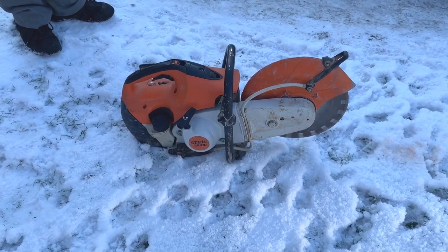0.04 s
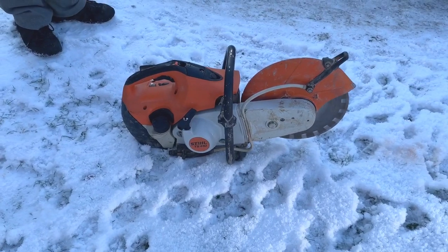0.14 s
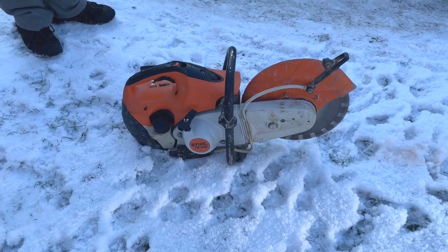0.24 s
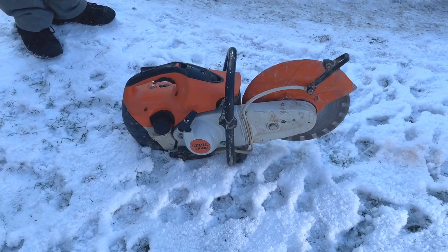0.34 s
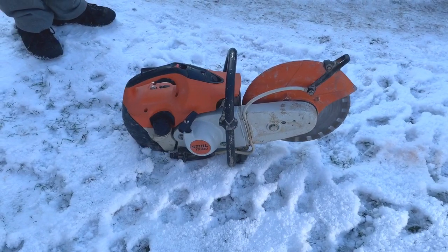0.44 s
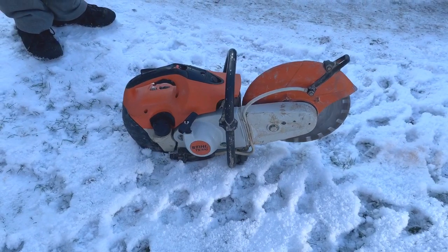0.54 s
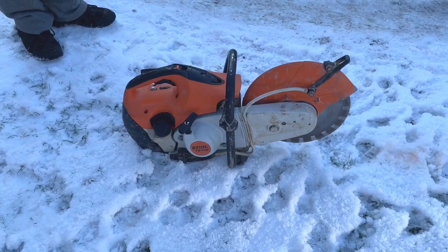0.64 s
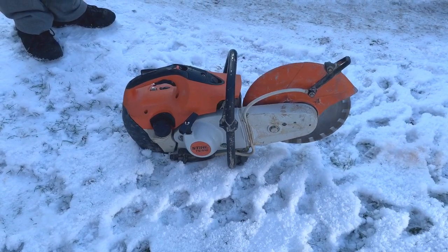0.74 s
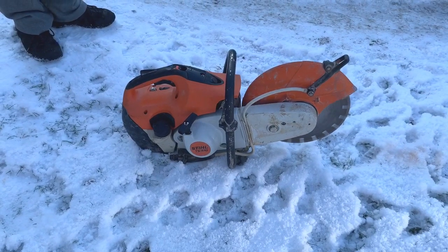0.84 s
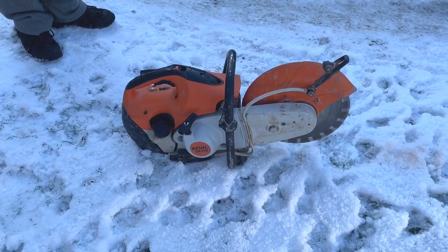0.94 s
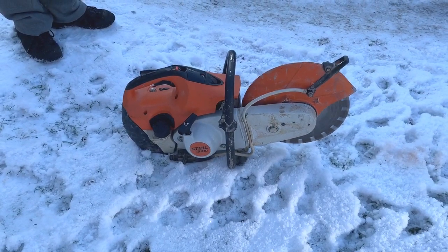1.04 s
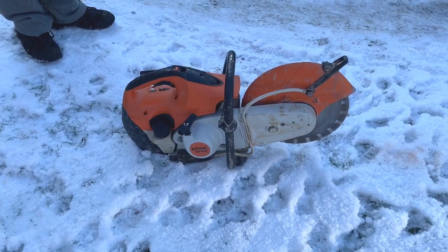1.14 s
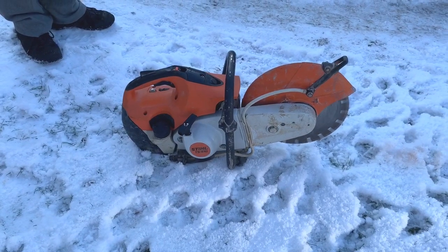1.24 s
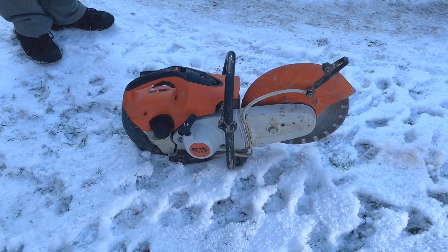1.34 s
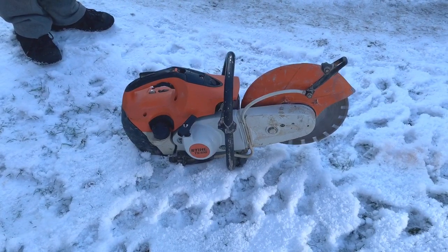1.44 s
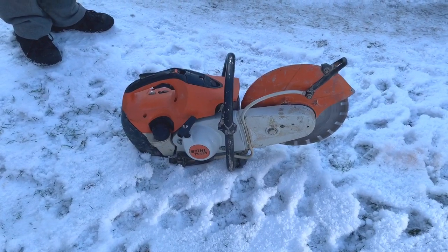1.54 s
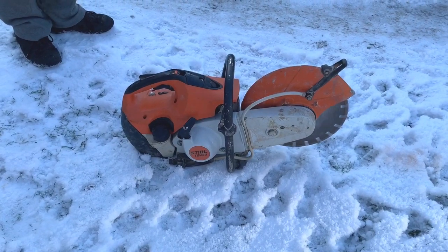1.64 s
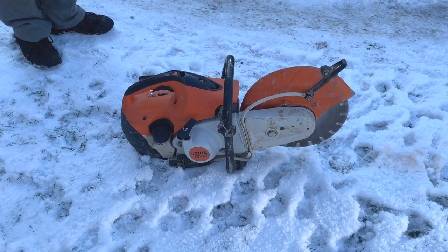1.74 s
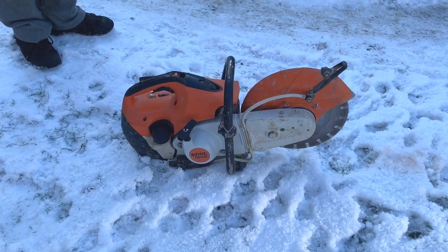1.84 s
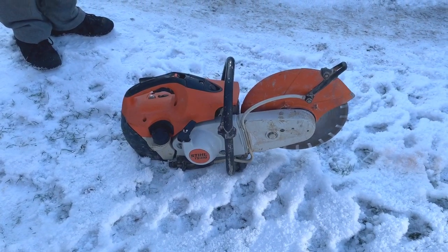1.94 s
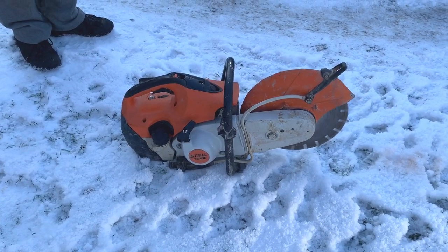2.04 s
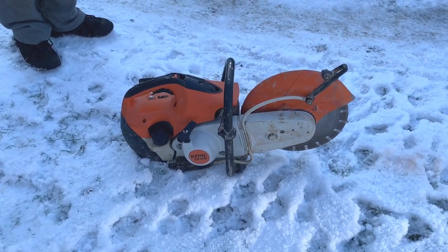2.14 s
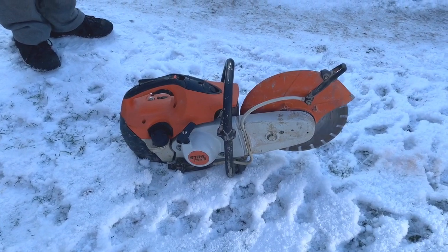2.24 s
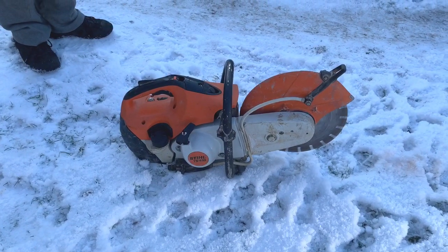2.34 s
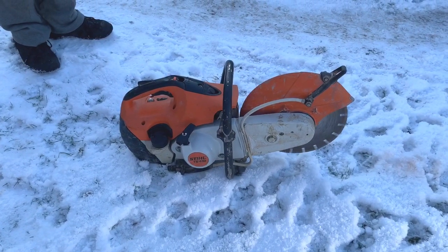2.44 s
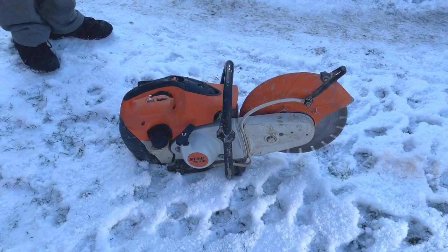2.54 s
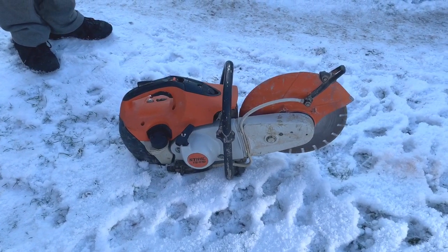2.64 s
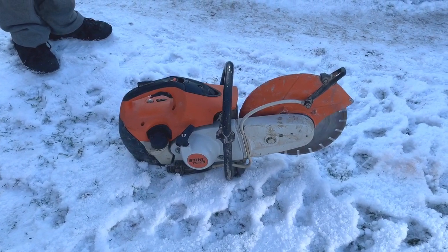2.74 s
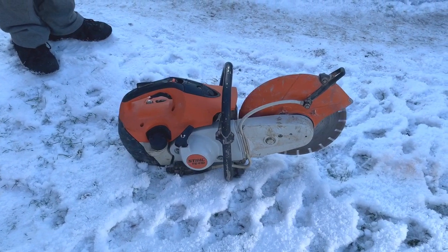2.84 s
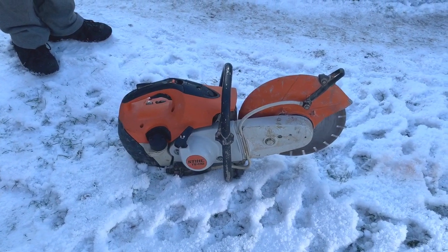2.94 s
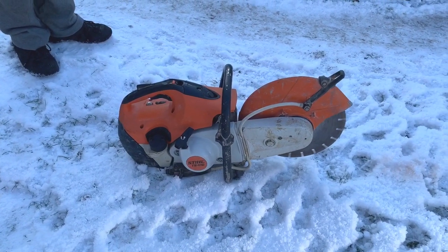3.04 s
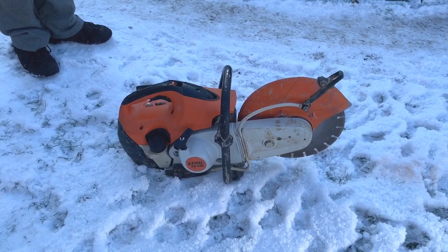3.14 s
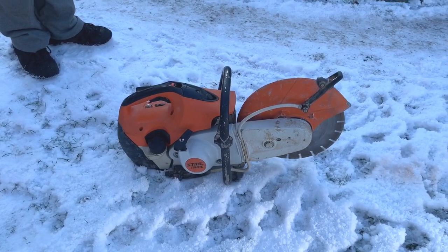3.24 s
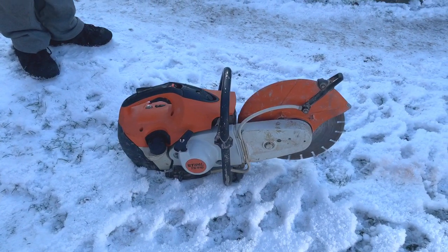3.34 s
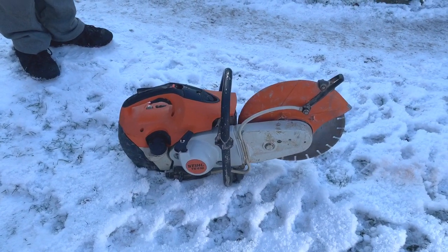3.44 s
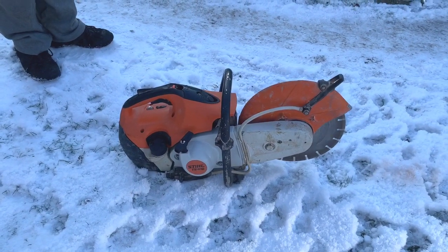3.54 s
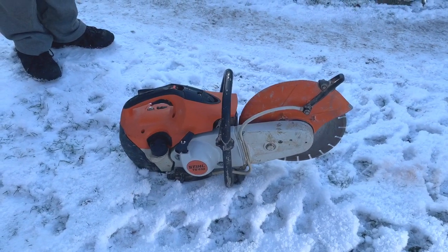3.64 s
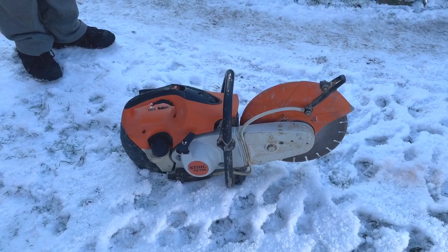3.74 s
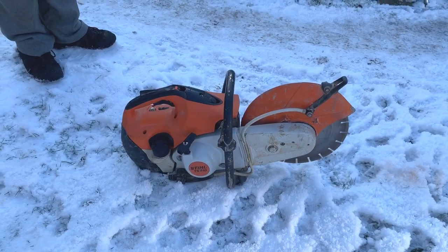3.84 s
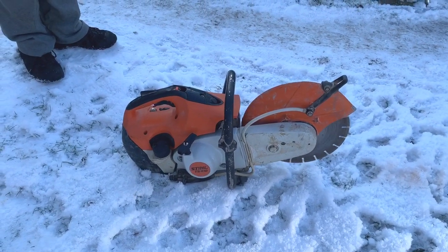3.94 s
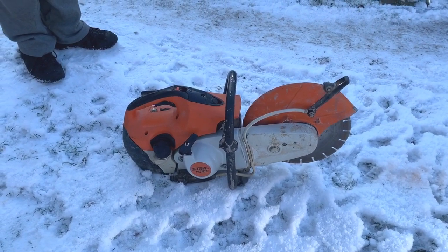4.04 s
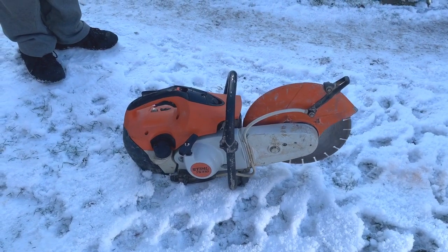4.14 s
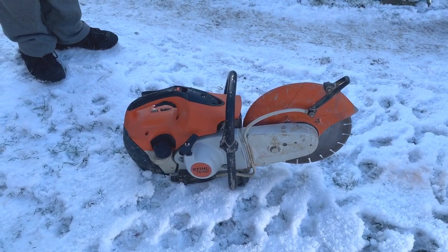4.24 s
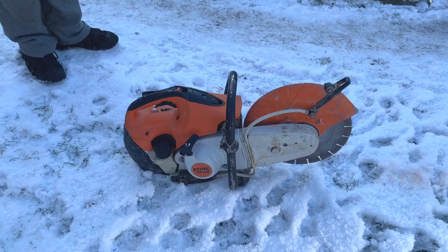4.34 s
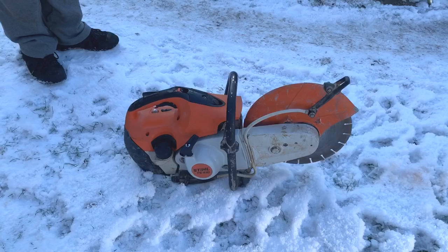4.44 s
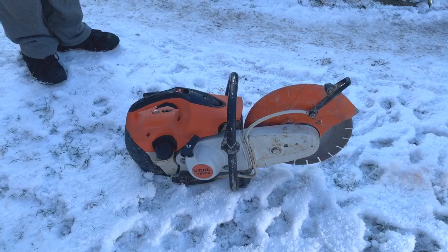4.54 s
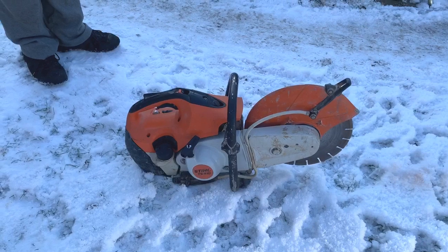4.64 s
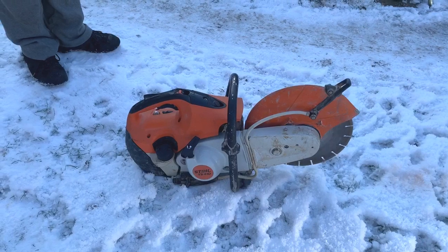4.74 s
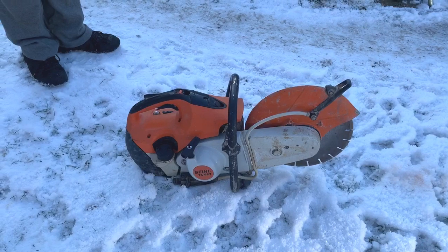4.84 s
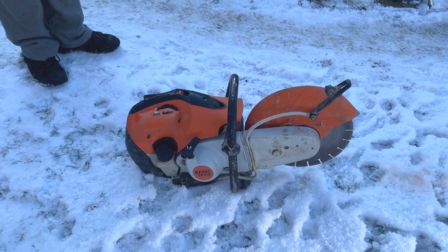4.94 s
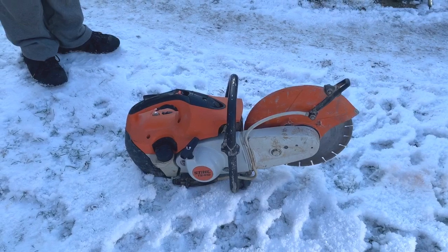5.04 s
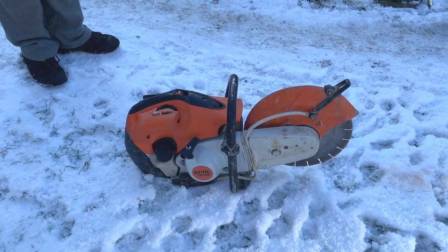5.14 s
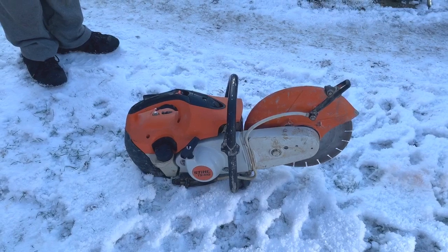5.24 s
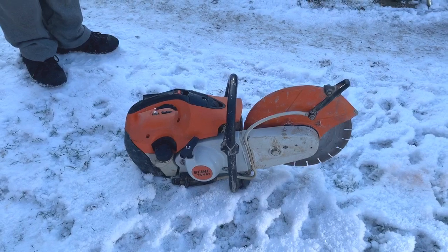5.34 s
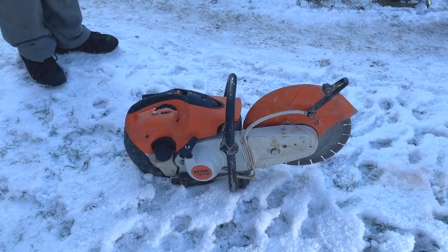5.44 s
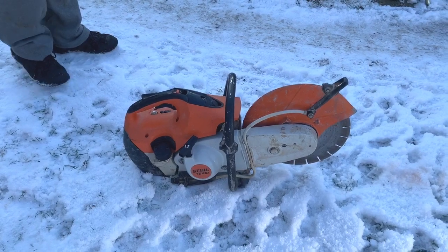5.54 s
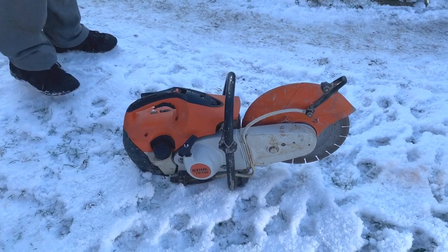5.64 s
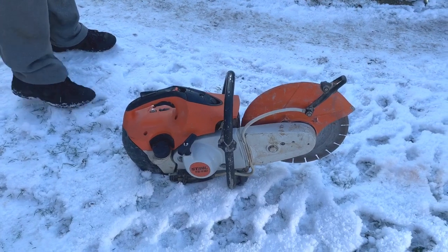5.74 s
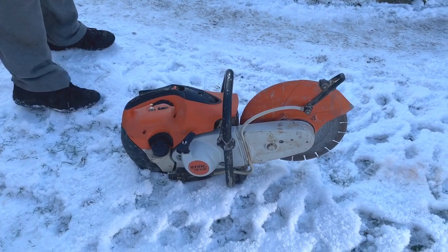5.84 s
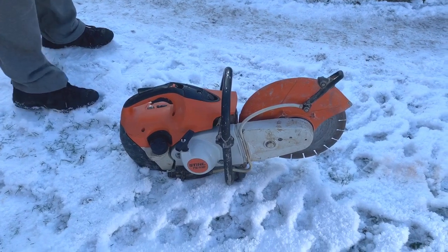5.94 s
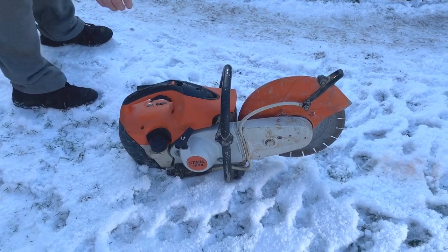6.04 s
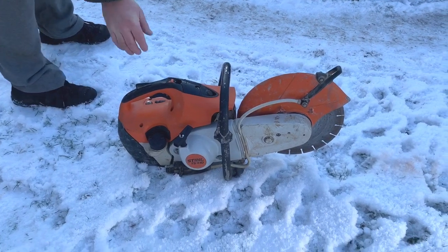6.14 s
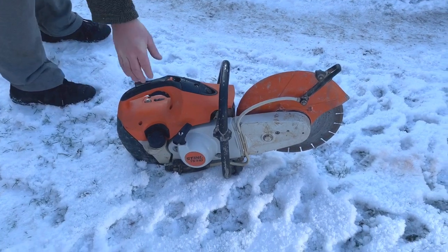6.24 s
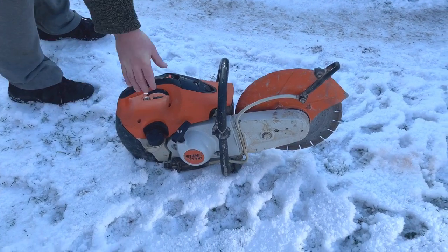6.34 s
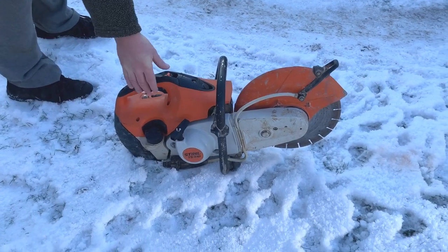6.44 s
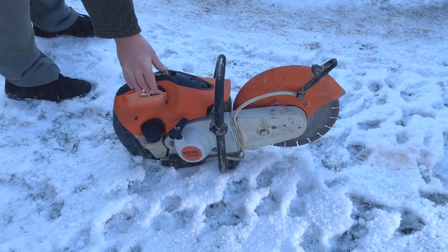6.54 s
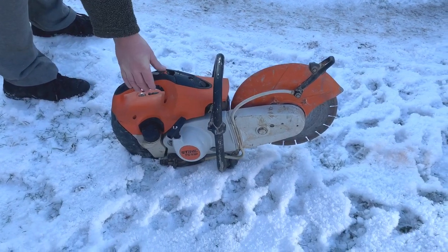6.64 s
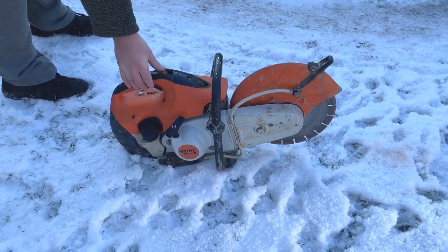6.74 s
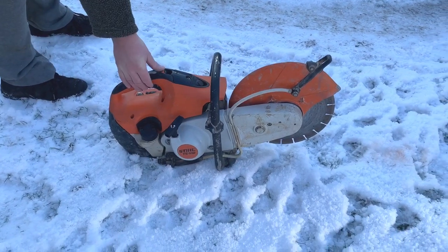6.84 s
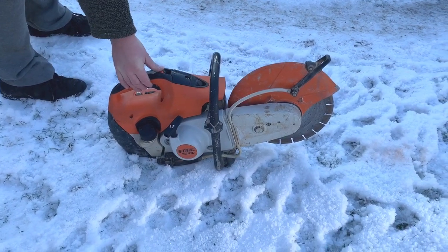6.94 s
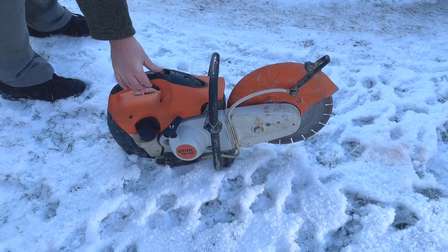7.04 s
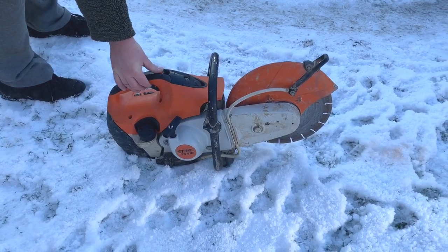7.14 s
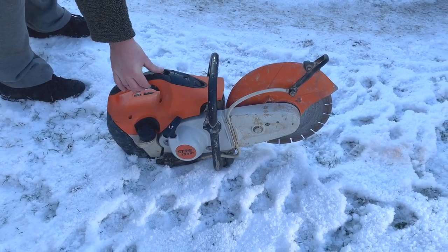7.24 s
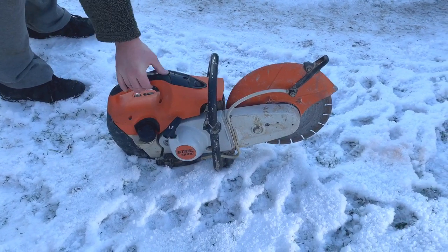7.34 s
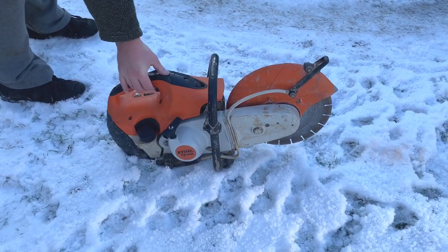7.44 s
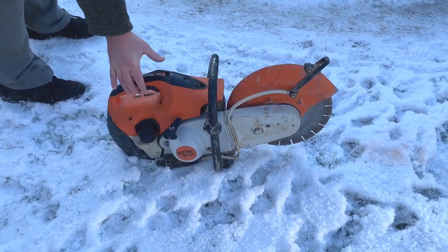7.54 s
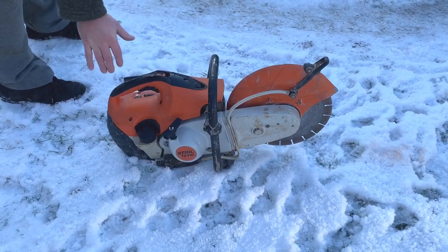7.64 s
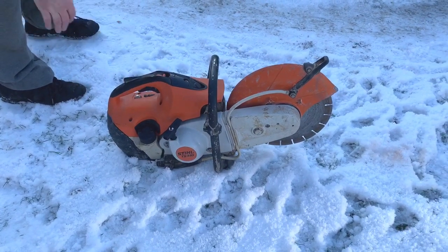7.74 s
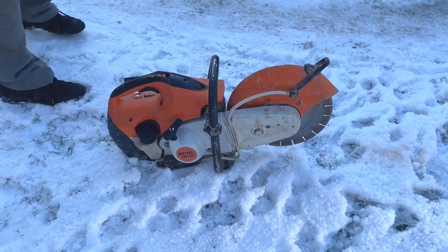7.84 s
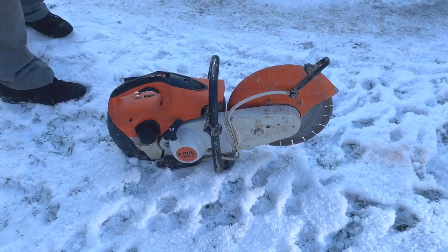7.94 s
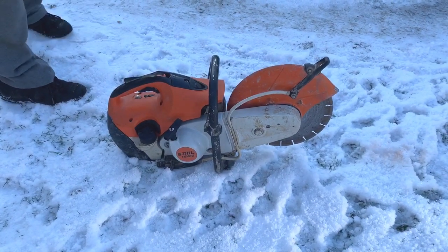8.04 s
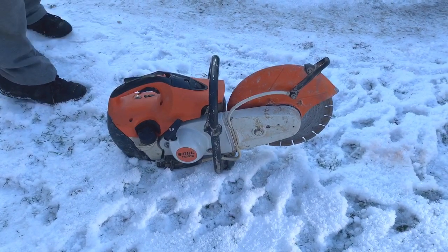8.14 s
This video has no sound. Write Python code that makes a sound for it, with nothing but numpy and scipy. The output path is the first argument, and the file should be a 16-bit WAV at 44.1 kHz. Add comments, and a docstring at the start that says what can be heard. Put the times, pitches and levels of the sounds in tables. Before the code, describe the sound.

A two-stroke petrol cut-off saw idles very close on open snowy ground. Sharp cracks with deep thumps come unevenly, about six a second, each setting off a rattle of clutch, belt and guard over rapid low puffing. It starts slightly weaker and grows fuller. At about 7.2 seconds the firing stops; slowing puffs, clacks and a low sagging groan end near 8 seconds. Dry, close stereo pickup with no echo.

```python
"""On open, snowy ground a two-stroke petrol cut-off saw idles close by, is switched off and coasts to rest.
It fires only once every four to twelve turns: each firing cracks and thumps, kicks the crank faster and
shakes clutch, belt and guard into a clatter. Between firings the piston pumps air and knocks as it slows.
Metal sounds are sprays of noise shaped by the casing; low sounds are short tones, pulses and soft noise."""
import sys
import numpy as np
from scipy import signal
from scipy.fft import rfft, irfft, next_fast_len
from scipy.io import wavfile
from scipy.ndimage import uniform_filter1d

SR = 44100
rng = np.random.default_rng(int(sys.argv[2]) if len(sys.argv) > 2 else 0)


def write(x):
    x = np.atleast_2d(x).T
    wavfile.write(sys.argv[1], SR, np.round(np.clip(x, -1, 1) * 32767).astype(np.int16))


N = 361615
TIME = np.arange(N) / SR

# Firings; the kick speeds up the crank and shakes the drive. Each sound adds its own gain to these levels:
# (time [s], crack [dB], kick [dB])
FIRINGS = [(-0.04, -17, -18.5), (0.114, -16.5, -18.5), (0.35, -22, -37), (0.514, -17.5, -22.5),
           (0.66, -15, -15.5), (0.842, -15, -17), (1.001, -14.5, -13), (1.252, -15.5, -20.5),
           (1.391, -15.5, -20.5), (1.601, -17.5, -20), (1.744, -14.5, -17.5), (1.907, -13, -17),
           (2.068, -13.5, -16), (2.221, -18.5, -28.5), (2.509, -17, -21), (2.65, -12, -16.5),
           (2.811, -12.5, -16.5), (2.97, -13, -18.5), (3.108, -12, -17), (3.34, -16, -21.5),
           (3.494, -19, -28.5), (3.619, -14, -17.5), (3.783, -11.5, -10), (3.971, -13, -15),
           (4.129, -14, -19.5), (4.275, -11.5, -13), (4.455, -12.5, -13), (4.612, -12, -13.5),
           (4.772, -14.5, -20.5), (4.884, -18, -23), (5.006, -12, -14), (5.168, -12.5, -17.5),
           (5.278, -14.5, -17), (5.516, -12, -16.5), (5.655, -10, -15), (5.814, -13, -14), (5.98, -10, -13),
           (6.332, -15, -17), (6.477, -13, -12.5), (6.711, -15, -22), (6.824, -13.5, -15.5),
           (6.984, -10.5, -12.5), (7.156, -11.5, -13.5)]
# Unfired turns with the ignition off: (time [s])
COASTING_TURNS = [7.346, 7.382, 7.426, 7.492, 7.552, 7.617, 7.694, 7.785]
# Loose metal parts clinking, before the gain of each part of the sound: (time [s], level [dB], treble [dB])
CLINKS = [(0.2972, -13, -19.5), (0.422, -30, -22), (0.4494, -39, -21), (1.1667, -9.5, -16),
          (2.0223, -27, -20), (3.259, -9.5, -15.5), (3.4714, -21, -21), (4.3714, -8, -25),
          (5.4184, -11, -16.5), (6.125, -15, -22), (6.1475, -9.5, -20.5), (7.3593, -14, -24.5),
          (7.435, -23, -24), (7.647, -19.5, -25), (7.6847, -30, -34), (7.7353, -25.5, -33.5),
          (7.8131, -28.5, -61), (7.9154, -30.5, -52)]

# Tone colour of the muffler's puff, relative levels: (frequency [Hz], level [dB])
PUFF_SPECTRUM = [(20, -42.5), (45, -17.5), (70, 2), (100, 6.5), (140, -2.5), (200, -5.5), (300, -18.5),
                 (500, -14.5), (1200, -69)]
# Tone colour of the deep thump of a firing: (frequency [Hz], level [dB])
THUMP_SPECTRUM = [(18, -44.5), (36, -21), (60, 1.5), (110, -5.5), (170, -1), (300, -13.5), (500, -9.5),
                  (1200, -46.5)]
# Tone colour of the longer, duller blast of a firing: (frequency [Hz], level [dB])
BLAST_SPECTRUM = [(40, -25), (150, -4.5), (420, -8.5), (850, 3), (1250, -2.5), (1650, 4), (2600, -5),
                  (3600, -1.5), (4800, -11.5), (6300, -7), (14000, -11.5)]
# Tone colour of the very short, bright snap of a firing: (frequency [Hz], level [dB])
SNAP_SPECTRUM = [(2000, -18), (3700, 8), (4800, -5.5), (6500, 2), (8000, 5.5), (15000, -5)]
# Tone colour of chattering clutch, belt and guard: (frequency [Hz], level [dB])
CLATTER_SPECTRUM = [(40, -37), (420, -7), (850, -8), (1250, -10.5), (1650, -2), (2100, -2.5), (3000, -8),
                    (3900, -5.5), (4600, -21.5), (6200, -9), (7000, -22.5), (11300, -14), (12800, -19.5),
                    (14600, -20.5)]
# Tone colour of fan, belt and bearings: (frequency [Hz], level [dB])
RUSTLE_SPECTRUM = [(30, -28.5), (150, -1), (420, -4), (850, -4), (1250, -9), (1700, -4.5), (2200, -11),
                   (3000, -14.5), (3900, -16), (4600, -21), (6300, -18.5), (8000, -18.5), (11000, -19),
                   (14500, -35)]
# Tone colour of the piston slap: (frequency [Hz], level [dB])
KNOCK_SPECTRUM = [(300, -22.5), (1400, -29), (2200, -6.5), (2620, -3), (3050, -16.5), (3520, -8),
                  (4300, -29), (14000, -36)]
# Tone colour of the distant open-air hum: (frequency [Hz], level [dB])
OUTDOORS_SPECTRUM = [(30, 1), (100, -4.5), (250, -3.5), (600, 4), (900, -3.5), (1500, -21), (4000, -22),
                     (14000, -29.5)]
# Tone colour of gas flow buffeting the casing: (frequency [Hz], level [dB])
RUMBLE_SPECTRUM = [(25, -35.5), (60, -19.5), (110, 4), (230, 3.5), (330, 0.5), (600, -38.5)]
# Low resonance of the casing in the rumble: (frequency [Hz], width [Hz], boost [dB])
RUMBLE_RESONANCE = [(94.0, 66, 8)]
# Tone colour of the hollow clack of a clink: (frequency [Hz], level [dB])
CLACK_SPECTRUM = [(200, -2.5), (800, -4.5), (1250, -8.5), (1650, 0.0), (2200, 0.0),
                  (2800, -8), (3500, -3.5), (5000, -20.5), (14000, -41.5)]
# Tone colour of the bright tick of a clink: (frequency [Hz], level [dB])
TICK_SPECTRUM = [(1500, 4), (3500, -19.5), (5000, 0.0), (8000, 6.5), (11000, 1.5), (15000, -7)]

# Resonances of casing, fins and guard, shared by all metal noise; a negative boost is a dip:
# (frequency [Hz], width [Hz], boost [dB])
CASING_RESONANCES = [(452, 56, 2), (595, 55, 5.5), (703, 39, -4.5), (822, 65, 4.5), (1012.3, 40, -14.5),
                     (1034, 46, 12.5), (1210, 53, -9.5), (1234, 20, 13.5), (1566, 44, 5), (2025, 55, 7),
                     (2175, 56, 7.5), (2336, 45, -8), (2372, 24, 10.5), (2607, 58, 9.5), (3513, 68, 5.5),
                     (5890, 81, 6), (7940, 140, 5.5)]
# Guard and blade ringing on after a clink: (frequency [Hz], level [dB], time to fall 60 dB [s])
RING_MODES = [(824, -22, .4), (1863, -17, .16), (2713, -33, .9), (3806, -26, .5)]
# The whole saw rocking on its rubber mounts: (frequency [Hz], level [dB], time to fall 60 dB [s])
MOUNT_MODES = [(47, -14, 0.023), (94.4, -16.5, 0.16), (143.7, 7, 0.051)]

# How alike the two microphone channels are: (frequency [Hz], likeness [0 to 1])
CHANNEL_LIKENESS = [(100, 1), (500, .94), (1500, .95), (2000, .88), (2500, .65), (4000, .65), (5200, .45),
                    (6200, .55), (7000, .85), (8300, .995), (9000, .995), (11500, .9), (13200, .99),
                    (14500, .93)]
# Level of the left channel minus the right: (frequency [Hz], difference [dB])
CHANNEL_BALANCE = [(60, -15), (300, -1), (1000, -1), (1700, -1.5), (2700, -.6), (3500, -1.5), (5400, -9),
                   (6600, 0.5), (15000, 0)]
# Phase by which the right channel leads: (frequency [Hz], lead [radians])
CHANNEL_LEAD = [(1900, 0), (3200, -1.4), (4200, -.8), (5300, -2), (6400, -.2), (7200, .5), (8100, 2.95),
                (9000, 3.3), (10300, 5.9), (11700, 6.6), (12700, 9.2), (13800, 9.6), (14900, 12.2)]

EDGE_HZ = 15500  # upper edge of the sound
# Crank speed sought after a firing: a base, plus this much for a kick of 0 dB.
# Each later turn is longer by the share SLOWING; whole turns are then fitted between the firings.
BASE_TURNS_PER_S, KICK_TURNS_PER_S, SLOWING = 33, 45, .033
# The thump: its level at a usual crack, and the dB it gains for each dB of crack
THUMP_DB, USUAL_CRACK_DB, THUMP_PER_CRACK = -7, -13.5, 0.29
# Weaker sounds at the start, while the engine is cold; WARM_UP_S is the time constant of the recovery
WARM_UP_S, COLD_FLOW_DB, COLD_THUMP_DB, COLD_RUNNING_DB = 2.07, -1.5, -4.5, -5
# Changes reached by the last coasting turn: weaker gas flow, and a honk lower by a share of its pitch
SPENT_INTAKE_DB, SPENT_EXHAUST_DB, SPENT_SAG = -19, -7.5, 0.42
REST_S = 8.0  # the crank has stopped
# Steady running noise, before each sound's own gain: level at idling speed, and its rise with speed
RUNNING_DB, IDLE_TURNS_PER_S, RUNNING_DB_PER_OCTAVE = -23.5, 34.6, 4
# With the ignition off the drive runs slack: running noise drops by this much over this time
SLACK_DB, SLACK_S = -11, 0.18
# Groan of the stopping drive: time of its peak, level and pitch there, and how fast it sinks
GROAN_S, GROAN_DB, GROAN_HZ, GROAN_OCTAVES_PER_S = 7.89, -41, 111, 2.1
GROAN_RISE_S, GROAN_FALL_S = .05, .085


def from_db(db):
    """Turns decibels into gain."""
    return 10 ** (np.asarray(db) / 20)


def unit(x):
    """Scales a signal to an average strength (rms) of 1."""
    return x / np.sqrt(np.mean(x ** 2) + 1e-20)


def lookup(points, hz):
    """Reads a table by frequency, spaced by pitch (a log axis)."""
    f, value = np.transpose(points)
    return np.interp(np.log(hz + 1), np.log(f), value)


def strikes(times, gains):
    """Makes a train of single clicks."""
    train = np.zeros(N)
    at = np.round(np.asarray(times) * SR).astype(int)
    inside = (at >= 0) & (at < N)
    np.add.at(train, at[inside], np.asarray(gains)[inside])
    return train


def response(spectrum, resonances=(), size=4096):
    """Filter with a given tone colour and resonances that answers at once (minimum phase), peak 1."""
    hz = np.fft.rfftfreq(size, 1 / SR)
    peaks = sum(boost / (1 + (2 * (hz - f) / width) ** 2) for f, width, boost in resonances)
    db = lookup(spectrum, hz) + peaks
    # folding the cepstrum moves all the response after time zero
    cepstrum = irfft(np.log(from_db(db)))
    cepstrum[1:size // 2] *= 2
    cepstrum[size // 2 + 1:] = 0
    taps = irfft(np.exp(rfft(cepstrum)))
    return taps / abs(taps).max()


def bursts(times, db, rise, fall):
    """Power of bursts that swell up to the given times and then die away (rise and fall in s)."""
    t = np.arange(-SR // 10, SR // 10 + 1) / SR
    shape = np.exp(-2 * np.maximum(-t / rise, t / fall))
    return abs(signal.oaconvolve(strikes(times, from_db(db) ** 2), shape, "same"))


def metal(power, spectrum, spread_db, per_second=1400, fall=0.0035):
    """A dense spray of tiny impacts, each dying quickly in the casing; two channels."""
    strength = from_db(spread_db * np.minimum(rng.standard_normal(N), 2)) ** 2
    impacts = (rng.random(N) < per_second / SR) * strength
    grains = signal.lfilter([1], [1, -np.exp(-2 / (fall * SR))], impacts)
    taps = response(spectrum, CASING_RESONANCES)
    drive = np.sqrt(power * grains / grains.mean()) * rng.standard_normal((2, N))
    return signal.oaconvolve(drive, taps[None] / np.linalg.norm(taps), axes=1)[:, :N]


def ringing(modes):
    """One second of freely dying tones."""
    t = np.arange(SR) / SR
    return sum(from_db(db - 60 * t / t60) * np.sin(2 * np.pi * hz * t) for hz, db, t60 in modes)


def crank():
    """Times of all running turns: a harder kick spins the crank faster, then each turn takes longer."""
    fired, _, kick_db = np.transpose(FIRINGS)
    speeds = BASE_TURNS_PER_S + KICK_TURNS_PER_S * from_db(kick_db)
    ends = np.append(fired[1:], COASTING_TURNS[0])
    turns = []
    for start, end, speed in zip(fired, ends, speeds):
        count = round(np.log1p((end - start) * speed * SLOWING) / np.log1p(SLOWING))
        periods = (1 + SLOWING) ** np.arange(count)
        turns.append(start + (end - start) * (np.cumsum(periods) - periods) / periods.sum())
    return np.concatenate(turns)


def cold(times):
    """1 for the freshly started engine, falling towards 0 as it warms."""
    return np.exp(-np.maximum(times, 0) / WARM_UP_S)


def throb(turns, depth_db, lag):
    """Power factor that swells once in every turn of the crank, unevenly; lag is in turns."""
    angle = np.interp(TIME, turns, np.arange(len(turns)))
    uneven_db = np.interp(TIME, turns, rng.standard_normal(len(turns)))
    return from_db(depth_db * np.cos(2 * np.pi * (angle - lag)) + uneven_db) ** 2


def running_db(turns, inertia_s=0.1):
    """Level of the steady running noise: it follows the smoothed speed of the crank down to rest."""
    times = np.append(turns, COASTING_TURNS)
    midpoints = (times[1:] + times[:-1]) / 2
    speed = np.interp(TIME, np.append(midpoints, REST_S), np.append(1 / np.diff(times), 0))
    speed = np.maximum(uniform_filter1d(speed, round(inertia_s * SR)), .01)
    speed_db = RUNNING_DB_PER_OCTAVE * np.log2(speed / IDLE_TURNS_PER_S)
    slack_db = SLACK_DB * np.clip((TIME - COASTING_TURNS[0]) / SLACK_S, 0, 1)
    return RUNNING_DB + speed_db + COLD_RUNNING_DB * cold(TIME) + slack_db


def outdoors(level_db=-56, waver_db=4.0, waver_s=.04):
    """Faint, distant open-air hum: filtered noise whose level wavers a little."""
    taps = response(OUTDOORS_SPECTRUM)
    waver = unit(uniform_filter1d(rng.standard_normal(N), round(waver_s * SR)))
    hum = unit(signal.oaconvolve(rng.standard_normal((2, N)), taps[None], axes=1)[:, :N])
    return from_db(level_db + waver_db * waver) * hum


def rustle(turns, gain_db=-2):
    """Fan, belt and bearings make a noise that pulses with the crank."""
    power = from_db(running_db(turns) + gain_db) ** 2
    return metal(power * throb(turns, depth_db=3.5, lag=0.58), RUSTLE_SPECTRUM, spread_db=3.5)


def rumble(turns, gain_db=-4):
    """Uneven gas flow buffets the casing and stirs its low resonance."""
    taps = response(RUMBLE_SPECTRUM, RUMBLE_RESONANCE, size=16384)
    noise = unit(signal.oaconvolve(rng.standard_normal(N), taps)[:N])
    return noise * from_db(running_db(turns) + gain_db)


def gas_flow(turns, intake_hz=240, intake_length=0.0039, intake_db=-13, exhaust_lag=0.00559,
             exhaust_db=-19.0, rocking_db=-11, recoil_db=-5, coast_db=3.0, fade_power=2.6,
             uneven_db=1.5, uneven_pitch=0.044, uneven_s=0.00038):
    """Each turn the air box honks and the muffler puffs; a firing adds a deep thump. Both rock the saw."""
    times = np.append(turns, COASTING_TURNS)
    chance = rng.standard_normal((len(times), 4))
    coast_share = (times - COASTING_TURNS[0]) / (COASTING_TURNS[-1] - COASTING_TURNS[0])
    spent = np.clip(coast_share, 0, 1) ** fade_power
    flow_db = coast_db * (times >= COASTING_TURNS[0]) + COLD_FLOW_DB * cold(times)

    gulp = from_db(intake_db + flow_db + SPENT_INTAKE_DB * spent + uneven_db * chance[:, 0])
    pitch = intake_hz * (1 - SPENT_SAG * spent + uneven_pitch * chance[:, 1])
    nearest = np.searchsorted((times[1:] + times[:-1]) / 2, TIME)
    t = TIME - times[nearest]
    port_opening = np.exp(-(t / intake_length) ** 2)  # the port opens and shuts smoothly
    honks = gulp[nearest] * port_opening * np.cos(2 * np.pi * pitch[nearest] * t)

    puff_db = exhaust_db + flow_db + SPENT_EXHAUST_DB * spent + uneven_db * chance[:, 3]
    puffs = strikes(times + exhaust_lag + uneven_s * chance[:, 2], from_db(puff_db))

    fired, crack_db, _ = np.transpose(FIRINGS)
    thump_db = THUMP_DB + THUMP_PER_CRACK * (crack_db - USUAL_CRACK_DB) + COLD_THUMP_DB * cold(fired)
    thumps = strikes(fired + 0.0011, from_db(thump_db))
    exhaust = signal.oaconvolve(puffs, response(PUFF_SPECTRUM))
    exhaust = exhaust - signal.oaconvolve(thumps, response(THUMP_SPECTRUM))

    pushes = puffs - from_db(recoil_db) * thumps
    rocking = signal.oaconvolve(pushes, from_db(rocking_db) * ringing(MOUNT_MODES))
    # slow motion hardly radiates sound
    sway = signal.sosfilt(signal.butter(4, 38, "high", fs=SR, output="sos"), rocking[:N])
    return honks + exhaust[:N] + sway


def cracks(lead=0.0044, blast_db=2.0, snap_lead=0.0043, snap_db=4):
    """Each firing gives a very short bright snap inside a longer, duller blast, just ahead of its thump."""
    fired, crack_db, _ = np.transpose(FIRINGS)
    blast_power = bursts(fired - lead, crack_db + blast_db, rise=0.0024, fall=0.017)
    blast = metal(blast_power, BLAST_SPECTRUM, spread_db=0.0, per_second=4300)
    snap_power = bursts(fired - snap_lead, crack_db + snap_db, rise=0.0007, fall=0.008)
    snap = metal(snap_power, SNAP_SPECTRUM, spread_db=4.5, per_second=2900)
    return blast + snap


def clatter(turns, onset=0.015, decay=0.067, gain_db=5.0):
    """Each kick sets clutch, belt and guard chattering until the shaking dies down."""
    fired, _, kick_db = np.transpose(FIRINGS)
    recent = np.searchsorted(fired, TIME) - np.array([[1], [2]])  # the last two firings overlap
    t = np.maximum(TIME - fired[recent], 0)
    build_up = 1 - np.exp(-(t / onset) ** 2)
    shaking = from_db(kick_db + gain_db)[recent] * build_up * np.exp(-(t / decay) ** 0.86)
    power = (shaking ** 2).sum(axis=0) * throb(turns, depth_db=1.9, lag=0.72)
    return metal(power, CLATTER_SPECTRUM, spread_db=0.5)


def knocks(turns, lead=0.015, slow_period=0.034, slow_db=-16.0, db_per_octave=34, firing_db=-1.5):
    """The piston slaps near the top of its stroke: harder as the crank slows, and again at a firing."""
    periods = np.diff(turns)
    slowness = np.minimum(np.log2(periods / slow_period), 0)  # in octaves
    level_db = slow_db + db_per_octave * slowness + 2 * rng.standard_normal(len(periods))
    fired, crack_db, _ = np.transpose(FIRINGS)
    power = bursts(turns[1:] - lead, level_db, rise=.003, fall=.011)
    power += bursts(fired - .013, crack_db + firing_db, rise=0.0015, fall=0.014)
    return metal(power, KNOCK_SPECTRUM, spread_db=2.5, per_second=3000)


def backlash(lead=0.0091, clack_db=-22, treble_db=-46):
    """As the engine coasts, play in the drive clacks at every compression: rows like those of CLINKS."""
    return [(s - lead, clack_db, treble_db) for s in COASTING_TURNS]


def clinks(body_db=-7, ring_db=-18, ring_per_db=0.9):
    """Loose parts strike: a hollow clack, a bright tick, and a faint ring of guard and blade."""
    times, db, treble_db = np.transpose(list(CLINKS) + backlash())
    ring_strikes = strikes(times, from_db(ring_db + ring_per_db * db))
    ring = signal.oaconvolve(ring_strikes, ringing(RING_MODES))[:N]
    clack_power = bursts(times + .003, db + body_db, rise=0.0033, fall=0.014)
    clack = metal(clack_power, CLACK_SPECTRUM, spread_db=5.0)
    tick_power = bursts(times + 0.00092, treble_db, rise=.001, fall=.006)
    tick = metal(tick_power, TICK_SPECTRUM, spread_db=-4.0)  # negative: a few impacts stand far out
    return clack + ring + tick


def shudder(jolt_db=-24, lag=0.01533, rock_hz=88, rise=0.0073, decay=0.048, last_db=-5):
    """Each slow compression of the run-down jolts the saw, which wobbles on its mounts."""
    t = np.arange(SR // 2) / SR
    wobble = (1 - np.exp(-t / rise)) * np.exp(-t / decay) * np.sin(2 * np.pi * rock_hz * t)
    fading_db = np.linspace(0, last_db, len(COASTING_TURNS))
    jolts = strikes(np.add(COASTING_TURNS, lag), from_db(jolt_db + fading_db))
    return signal.oaconvolve(jolts, wobble)[:N]


def groan():
    """A low tone of the drive that sinks and fades with the last of the motion."""
    t = TIME - GROAN_S
    hz = GROAN_HZ * 2 ** (-GROAN_OCTAVES_PER_S * np.maximum(t, -.5))
    swell = np.exp(-np.maximum(-t / GROAN_RISE_S, t / GROAN_FALL_S) ** 2)
    tone = np.sqrt(2) * np.sin(2 * np.pi * np.cumsum(hz) / SR)
    return tone * from_db(GROAN_DB) * swell


def microphones(sound):
    """Two channels hear the noise with likeness, level and phase that depend on frequency."""
    size = next_fast_len(N + SR)
    hz = np.fft.rfftfreq(size, 1 / SR)
    left, other = rfft(sound, size)
    alike = np.clip(lookup(CHANNEL_LIKENESS, hz), 0, 1)
    right = alike * left + np.sqrt(1 - alike ** 2) * other
    right = right * np.exp(1j * lookup(CHANNEL_LEAD, hz))
    tilt = from_db(lookup(CHANNEL_BALANCE, hz) / 2)
    return irfft(np.array([left * tilt, right / tilt]), size)[:, :N]


def scene():
    """The saw on open, snow-damped ground, without echo; the bass is slightly louder on the right."""
    turns = crank()
    noise = outdoors() + rustle(turns) + cracks() + clatter(turns) + knocks(turns) + clinks()
    bass = rumble(turns) + gas_flow(turns) + shudder() + groan()
    return microphones(noise) + bass * from_db([[-.65], [.65]])


def record(dry):
    """Peaks beyond full scale are cut flat, then the treble above the band edge is removed."""
    clipped = np.clip(dry, -1, 1)
    band_limit = signal.firwin(161, EDGE_HZ, window=("kaiser", 8), fs=SR)
    return signal.oaconvolve(clipped, band_limit[None], "same")


dry = scene()
out = record(dry)
write(out)
```